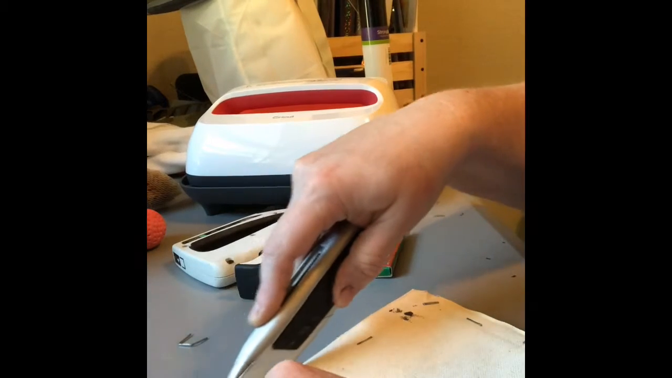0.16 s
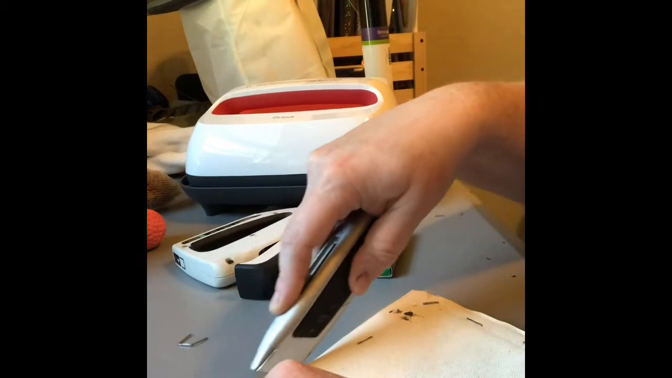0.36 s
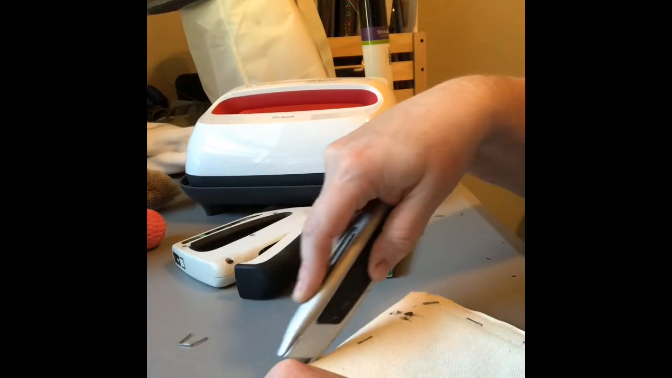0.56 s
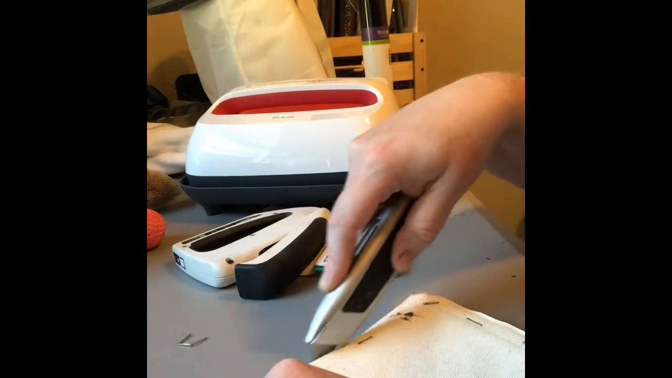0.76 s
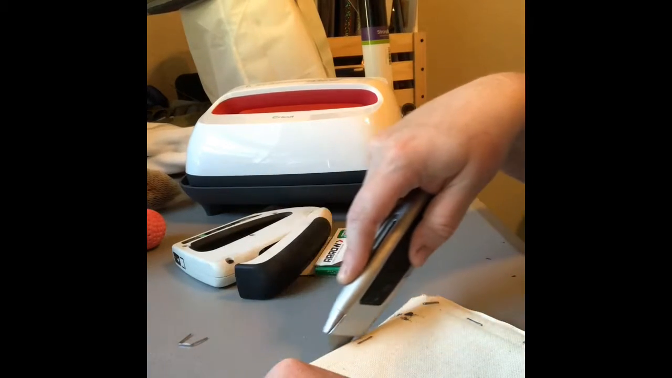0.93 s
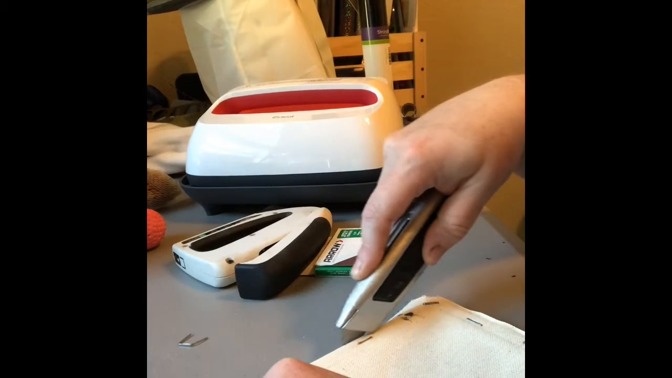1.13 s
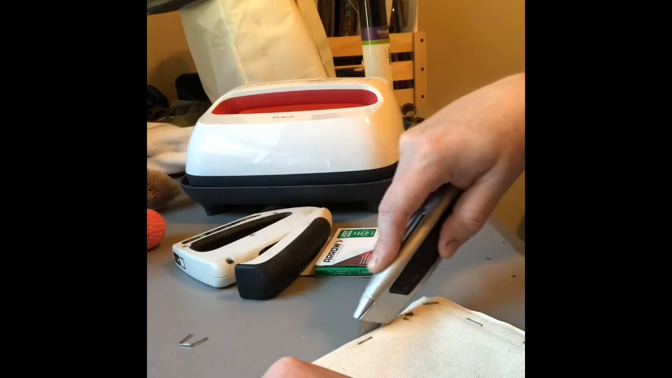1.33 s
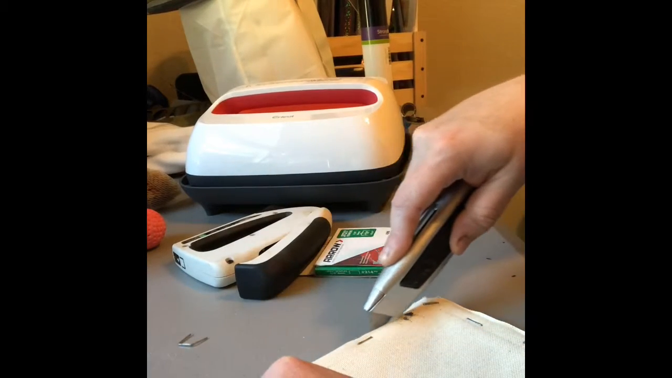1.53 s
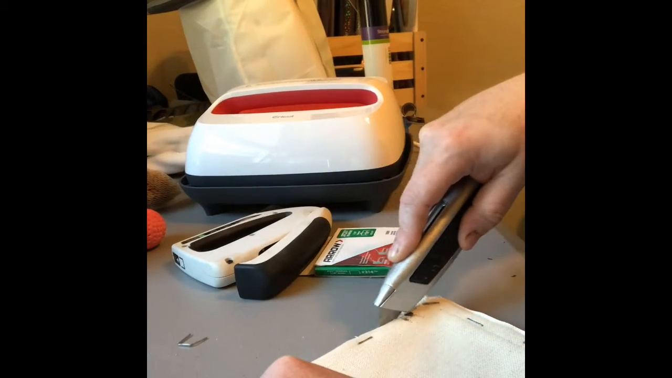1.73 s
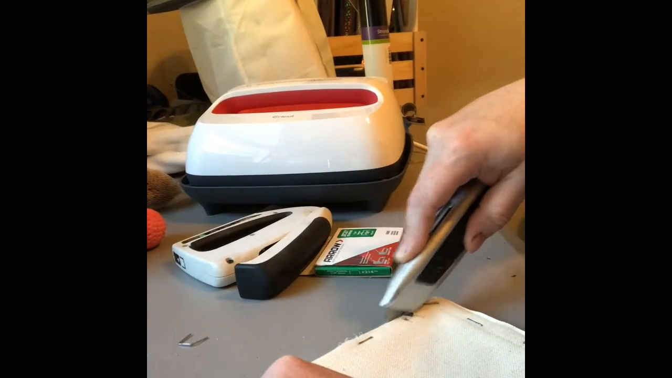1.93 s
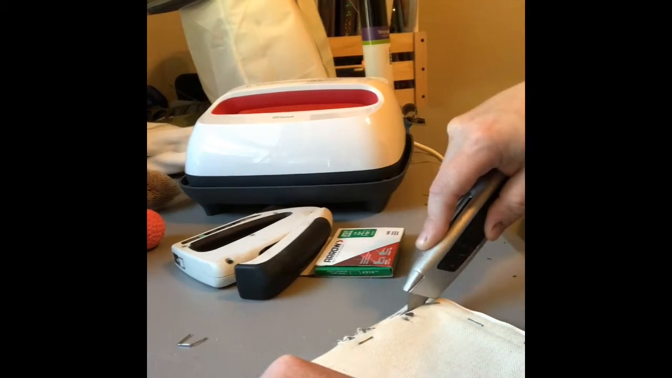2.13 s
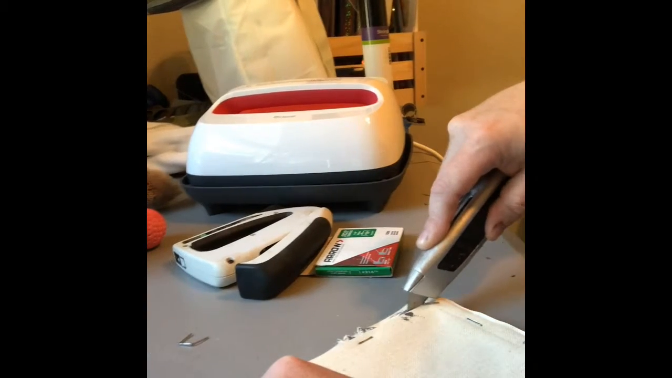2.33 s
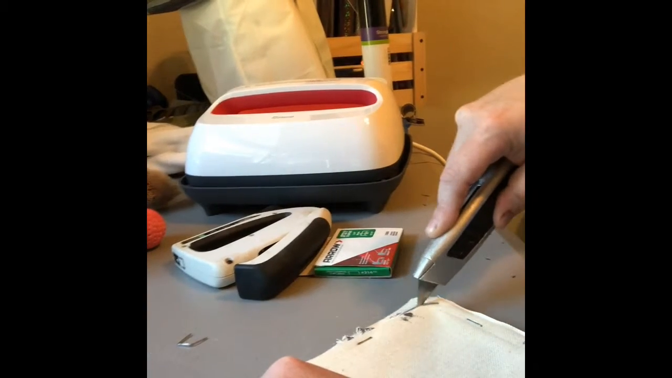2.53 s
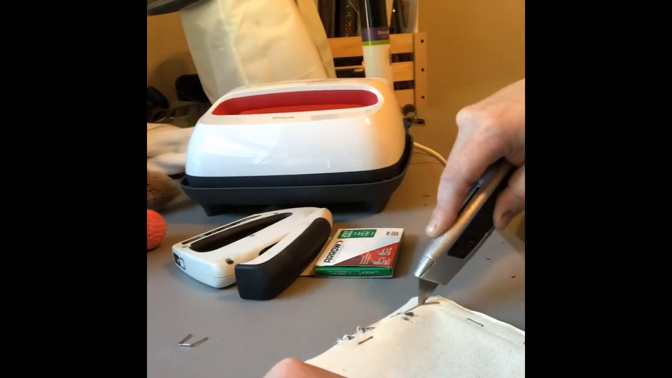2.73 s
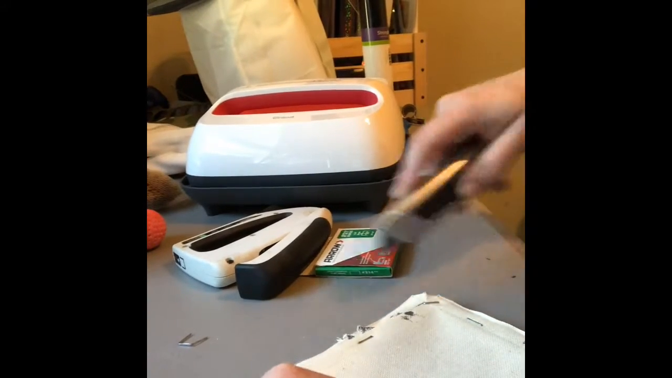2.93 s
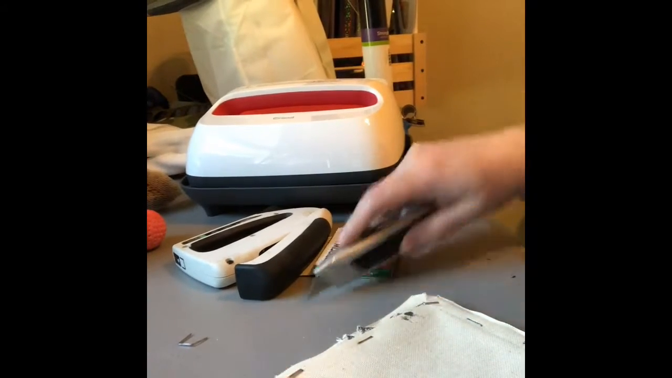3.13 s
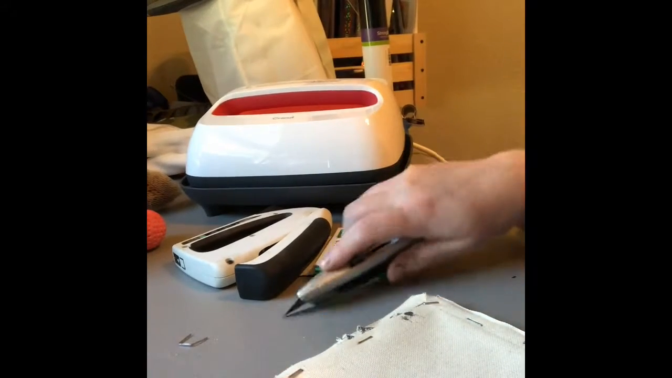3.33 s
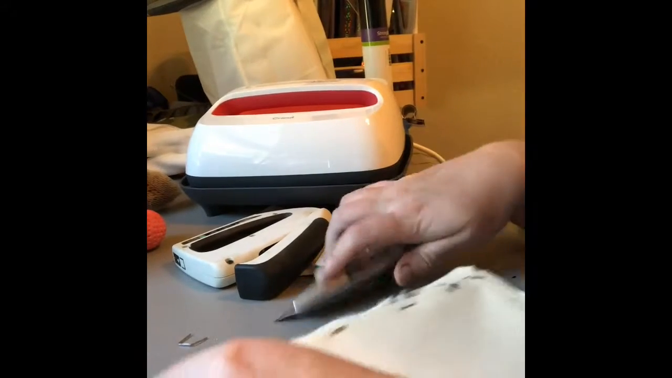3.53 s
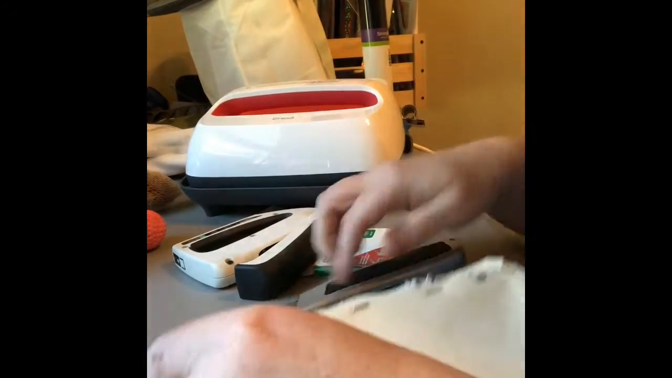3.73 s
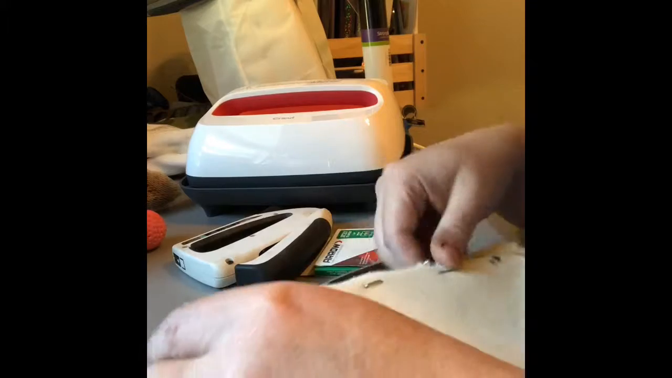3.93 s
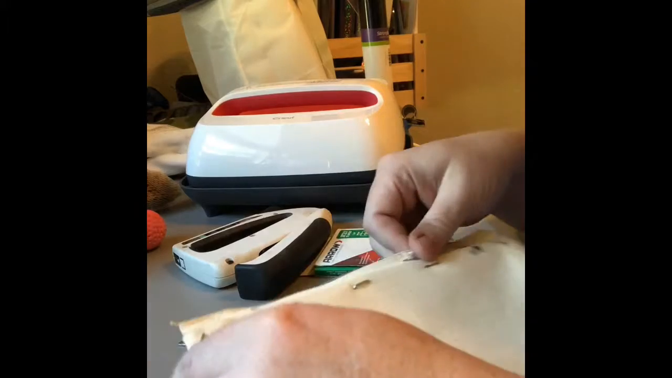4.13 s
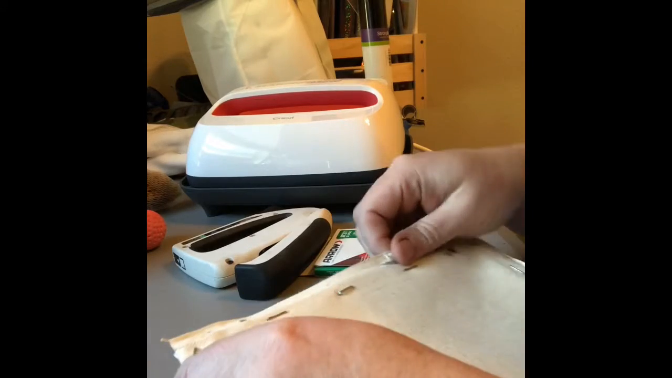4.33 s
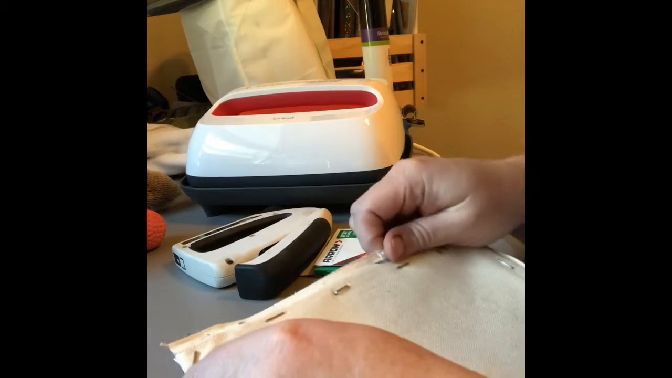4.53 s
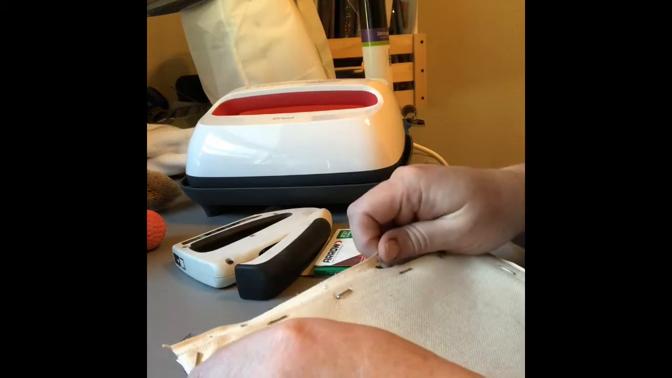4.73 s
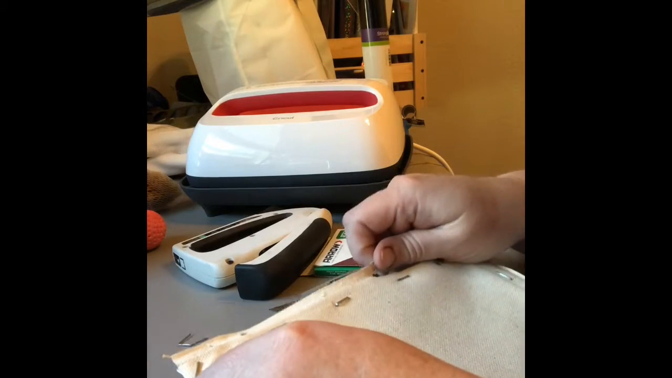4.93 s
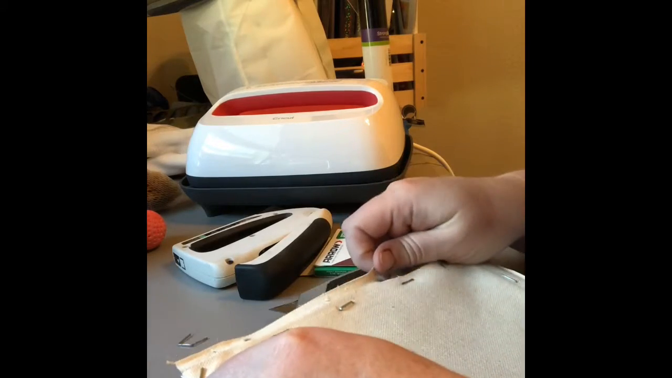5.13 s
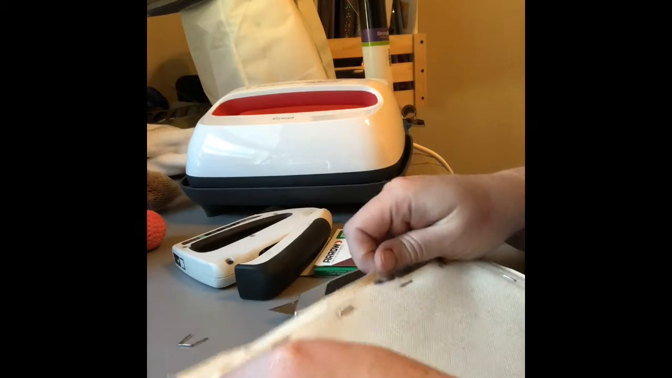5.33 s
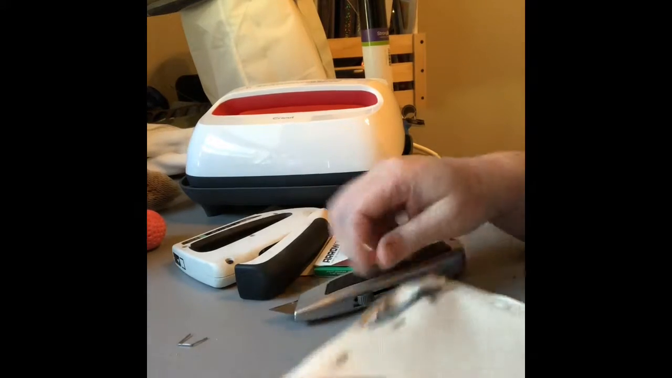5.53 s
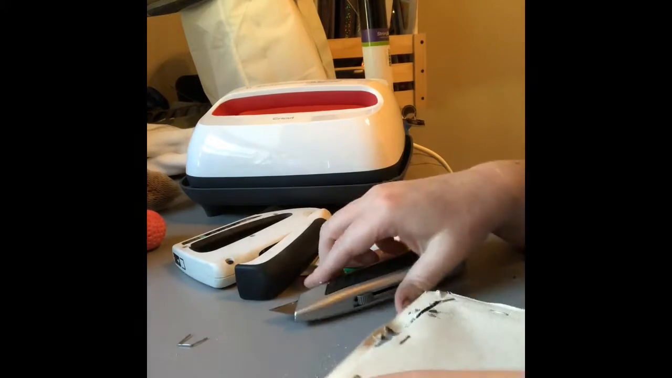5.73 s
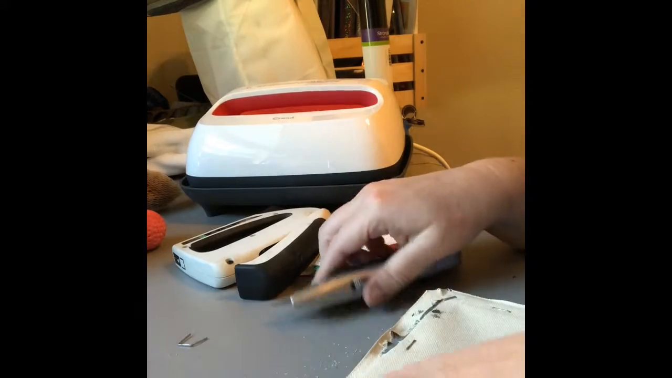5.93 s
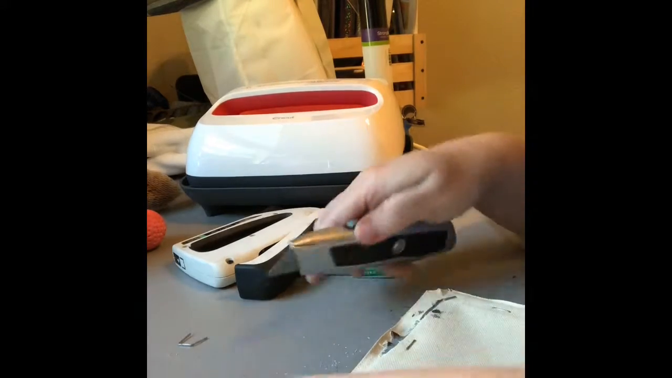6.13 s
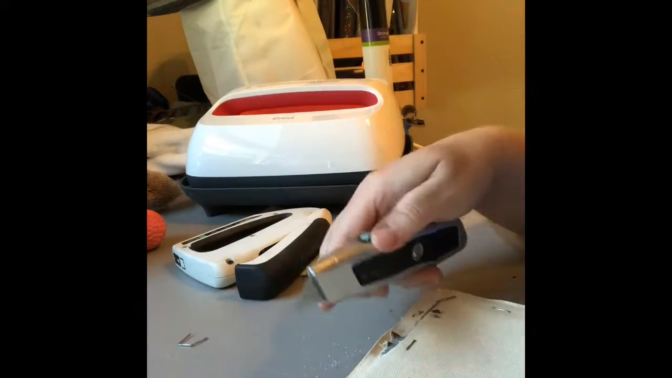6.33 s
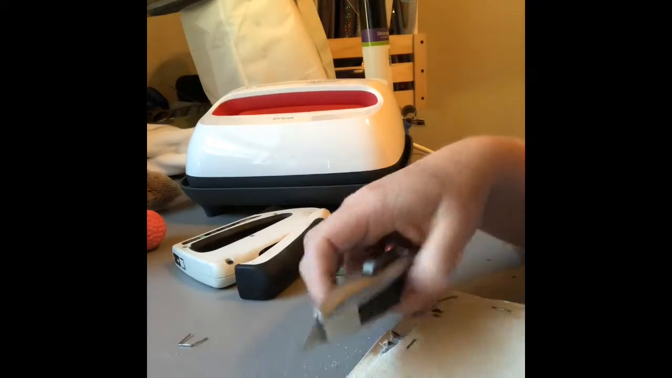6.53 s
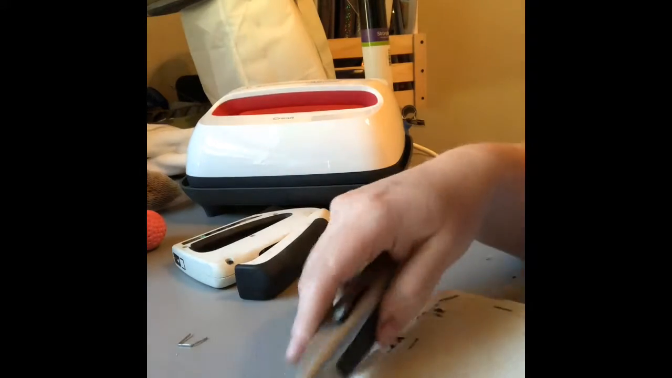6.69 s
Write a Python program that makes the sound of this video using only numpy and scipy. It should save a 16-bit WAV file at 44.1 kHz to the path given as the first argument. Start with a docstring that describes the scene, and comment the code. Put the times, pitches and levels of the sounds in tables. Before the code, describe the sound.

In a small quiet room, a hand works a metal knife under staples in canvas on a wooden frame. A loud clatter of knocks comes at once, then dry scraping, ticks and sharper prying bursts. Near the middle the knife is put down with hard knocks; faint skin rubbing and a thin squeak follow, then another knock and clatter as the knife is picked up. Close phone microphone, short dull room tail.

```python
"""A small quiet room with a table: a hand works a metal knife under staples in a canvas-covered wooden frame.
Soft filtered noise makes the room air, and a faint steady sine whines above it.
Canvas and skin rub in dense noise grains through resonances of weave, knife, wood and table.
The knife ticks in noise cracks and decaying modes; frame and knife knock on the ringing table top.
A staple squeaks in narrow noise, and a short diffuse tail follows all the sounds on the table."""
import sys
import numpy as np
from scipy import signal
from scipy.fft import rfft, irfft
from scipy.io import wavfile
from scipy.ndimage import uniform_filter1d

SR = 44100
rng = np.random.default_rng(int(sys.argv[2]) if len(sys.argv) > 2 else 0)


def unload_audio(sound):
    """Save the sound as a 16-bit wav file, at the path given as the first command line argument."""
    columns = np.transpose(np.atleast_2d(sound))
    # keep every value between -1 and 1, then stretch to whole-number steps
    steps = np.round(np.clip(columns, -1, 1) * 32767)
    wavfile.write(sys.argv[1], SR, steps.astype(np.int16))


N = 298116  # length in samples

# spectrum of the room air: (frequency [Hz], relative density [dB per Hz])
AIR_SPECTRUM = [(18, -50), (30, -5), (280, -5), (328, -6), (1160, -18.5), (1280, -19), (3060, -27),
                (6210, -28.5), (8520, -57), (14800, -34.5), (16000, -70)]
AIR_RMS_DB = -60.5  # before its gentle waver
# faint steady tone in the room: (frequency [Hz], rms level [dB])
WHINE_TONES = [(14998, -97)]
ROOM_DB, ROOM_T60_S, ROOM_HZ = -15, 0.2, 4000  # tail energy, decay, treble corner

# airy squeak as fingers draw a staple out, before its waver: (time [s], level [dB])
SQUEAK_LEVEL = [(4.8, -95), (4.9, -78), (5.17, -72), (5.45, -75), (5.52, -95)]
SQUEAK_HZ, SQUEAK_WIDTH_HZ = 4210, 180  # width of each of two passes

# modes of table top and frame: (frequency [Hz], relative level [dB])
TABLE_MODES = [(68, -5.5), (108, 2), (152, 1), (183, -1), (215, 1.5), (248, 0), (284, 1.5), (332, -2.5),
               (388, -4), (430, -8.5), (470, 6.5), (525, 2.5), (600, -1.5), (650, 11.5), (700, 17),
               (790, 15), (880, 29), (980, 40), (1120, -13), (1245, -8)]
# knocks on the table: (time [s], peak level [dB], struck region [Hz])
KNOCK_EVENTS = [(0.001, -30.5, 215), (0.11, -20, 250), (0.122, -10.5, 487), (0.133, -5, 295),
                (0.253, -22.5, 278), (0.483, -25.5, 300), (0.549, -21.5, 290), (1.164, -28, 403),
                (1.744, -21.5, 457), (1.78, -19.5, 333), (2.056, -29, 230), (2.151, -23, 510),
                (2.156, -18.5, 155), (2.544, -27, 150), (2.573, -25.5, 250), (2.587, -27, 175),
                (2.605, -25, 292), (2.885, -34.5, 223), (2.91, -28, 231), (2.931, -17.5, 433),
                (3.272, -32, 108), (3.433, -27, 410), (3.437, -22, 140), (3.498, -31.5, 287),
                (3.711, -9, 219), (3.744, -12, 170), (3.761, -12, 300), (3.784, -20, 300),
                (3.793, -19.5, 272), (3.814, -23, 117), (4.166, -42.5, 330), (4.246, -42, 333),
                (4.268, -34.5, 330), (4.365, -41.5, 340), (4.616, -55, 1100), (4.732, -32.5, 900),
                (4.734, -36.5, 327), (5.512, -40, 342), (5.676, -44, 200), (5.783, -41, 103),
                (5.949, -29, 330), (5.965, -6, 382), (6.077, -27, 420), (6.239, -38, 114),
                (6.29, -45.5, 754), (6.447, -38, 120), (6.634, -36.5, 280)]
# contact softness, decay at the struck pitch, distance at which modes are 6 dB weaker
KNOCK_CONTACT_MS, KNOCK_T60_S, KNOCK_OCTAVES = 0.44, 0.061, 0.52

# modes of knife body and blade: (frequency [Hz], relative level [dB])
KNIFE_MODES = [(1420, 19.5), (1640, 12), (1850, -34), (2300, 3.5), (2450, -23), (2660, -4.5), (2960, 4),
               (3250, 5), (3420, -3.5), (3900, -12), (4400, 2), (4800, 4), (5150, -5), (5480, 12),
               (6280, -4), (7100, -44), (7980, 1), (8640, -23)]
# knife and staple ticks; ring level is before its soft onset, top end is relative to it:
# (time [s], ring level [dB], struck region [Hz], top end [dB], ring T60 at the struck region [s])
TICK_EVENTS = [(0.117, -20, 2030, -20, 0.035), (0.1271, -13, 1770, -9, 0.025),
               (0.1315, -14, 3320, -19, 0.032), (0.142, -20, 5440, -21, 0.015),
               (0.483, -34.5, 2780, -8, 0.037), (0.5486, -27.5, 2850, -13, 0.026),
               (1.1671, -37, 2110, -6, 0.04), (1.3357, -34, 2370, -2, 0.032), (1.404, -39, 2300, -8, 0.032),
               (1.7421, -21.5, 2600, -20, 0.025), (1.7826, -31.5, 4890, -21, 0.029),
               (2.0524, -29.5, 2830, -4, 0.03), (2.1407, -28, 5780, 3, 0.03),
               (2.1514, -20.5, 2340, -9, 0.031), (2.2109, -36, 4770, -0.5, 0.022),
               (2.297, -43, 2410, -11, 0.03), (2.575, -30.5, 5170, -14, 0.025),
               (2.8468, -23.5, 3080, -1.5, 0.012), (2.8828, -17, 2450, -28, 0.0081),
               (2.9092, -20.5, 2600, -26, 0.013), (2.9294, -18.5, 2360, -32, 0.018),
               (2.933, -24, 2880, -25, 0.033), (3.082, -28, 4470, -29, 0.013),
               (3.0939, -36, 3300, -22, 0.011), (3.257, -42.5, 2180, -20, 0.085),
               (3.3384, -41, 5270, 6.5, 0.006), (3.413, -43, 3460, -3, 0.031),
               (3.4326, -27, 3050, -20, 0.014), (3.438, -36, 2380, -7, 0.031),
               (3.4934, -26.5, 3420, -24, 0.018), (3.7091, -14, 3300, -34, 0.026),
               (3.743, -16.5, 2980, -24, 0.03), (3.7525, -16.5, 5500, -24, 0.032),
               (3.779, -30, 5420, -14, 0.027), (3.793, -23.5, 5490, -18, 0.018),
               (3.936, -51.5, 2790, 2, 0.066), (3.9973, -49, 2930, -7, 0.045),
               (4.226, -43, 3310, -14, 0.05), (4.543, -43.5, 2210, 1, 0.025),
               (4.6168, -35, 2420, -15, 0.013), (4.7323, -31.5, 2770, 1.5, 0.02),
               (4.857, -48.5, 2410, -21, 0.024), (4.9152, -44, 2730, -17, 0.017),
               (5.0563, -41, 2180, -14, 0.018), (5.5036, -37, 2650, -10, 0.042),
               (5.513, -36.5, 2260, -3, 0.03), (5.5515, -42, 2970, -18, 0.033),
               (5.79, -50, 3250, -14, 0.03), (5.805, -38, 3380, -23, 0.036),
               (5.8565, -38.5, 3700, -20, 0.021), (5.903, -34, 2520, -11, 0.066),
               (5.9482, -22, 2280, -31, 0.024), (5.9643, -24.5, 3260, -28, 0.02),
               (6.0014, -26, 8800, 2, 0.022), (6.0054, -21, 3370, -16, 0.02),
               (6.0093, -21.5, 2530, -14, 0.029), (6.0173, -31, 3420, -14, 0.021),
               (6.0224, -33, 2460, -17, 0.026), (6.0748, -36, 3580, -32, 0.034),
               (6.291, -36.5, 3160, -18, 0.033)]
TICK_RISE_S = 0.0014  # metal slips off metal over a millisecond or so
# first contact of a tick, broad and very short; level relative to the tick
SNAP_DB, SNAP_T60_S, SNAP_HZ, SNAP_WIDTH_HZ = -4, 0.0024, 3030, 4500

# coarse weave of rubbed canvas: (frequency [Hz], width [Hz], relative level [dB])
COARSE_WEAVE = [(1120, 350, 3), (1370, 400, 0.5), (1725, 180, -1), (2040, 320, -3.5), (2336, 210, -4),
                (2767, 250, 0), (3560, 260, -6)]
# fine weave of rubbed canvas: (frequency [Hz], width [Hz], relative level [dB])
FINE_WEAVE = [(4280, 450, 4.5), (4810, 160, -6.5), (5250, 590, 5), (5780, 470, 0), (6380, 400, 0),
              (7210, 490, 0.5), (7830, 740, -2.5)]
# hiss of rubbed canvas: (frequency [Hz], width [Hz], relative level [dB])
CANVAS_HISS = [(8000, 540, 0), (9350, 730, 11), (10630, 710, 8), (11330, 500, -19), (12160, 780, 13),
               (13600, 680, -3), (14600, 2000, 7.5)]
# handle singing under a sliding hand: (frequency [Hz], width [Hz], relative level [dB])
HANDLE_HUM = [(3217, 260, 4), (3540, 195, -7)]
# body of the wooden frame: (frequency [Hz], width [Hz], relative level [dB])
WOOD_BODY = [(350, 91, -0.5), (474.5, 53, 1.5), (586, 116, 1), (798, 136, -5.5), (995, 110, -8)]

# In the gesture tables brightness is a control that each canvas layer scales;
# hum levels come before the hum layer's own trim.
# slow sliding of blade and hands; hum, wood and rumble are relative to the scrape:
# (time [s], scrape [dB], brightness [dB], knife hum [dB], wood body [dB], table rumble [dB])
SLIDE_MOTION = [(0, -72, -5, -14, -9, 0), (0.16, -53, -1, -6, 11, 7), (0.21, -44, 0.5, -9, -1.5, 7),
                (0.4, -48, -1, -4, -3.5, -0.5), (0.68, -48, -1.5, -13.5, -7, 3.5),
                (0.96, -47, 0, -12, 1.5, 4.5), (1.1, -52.5, -2.5, -3.5, -3, -4),
                (1.48, -55, -9, -10, -6, -6), (1.66, -47, -1.5, -6, -10.5, -1.5),
                (1.9, -62, -9, -10, 3, -5), (2.2, -65, -12, -6, 7, 3), (2.33, -73.5, -2, -15, 13, 22),
                (2.8, -71.5, -2, -12, -6, 9), (3.05, -68, -1, -2, -11, -1), (3.36, -54.5, -4, -5, -22, -15),
                (3.66, -57.5, -7.5, -11, 4.5, 6), (3.9, -64.5, -5, -4, -4, 9), (4.08, -64, -9, -8, -9, -2),
                (4.3, -74, -12, -3, 1, 9), (4.45, -57.5, 0.5, -7, -7.5, -2.5),
                (4.85, -69.5, -4.5, -14, 0.5, 5), (5.1, -62, -2.5, -20, -5, -7),
                (5.38, -68.5, -9, -18, -6, -6), (5.58, -55.5, -1, -4, -19, -9),
                (5.72, -53.5, -5, 0, -9.5, 0), (5.87, -53.5, -5, -2, -6, 3.5), (6.06, -58.5, 2, -9, 4, 6),
                (6.2, -67, 0.5, 2, -13, -7), (6.76, -62.5, -9.5, -14, -4, 5)]
# short strokes and shoves; wood and rumble are relative to the scrape:
# (time of full strength [s], rise [s], hold [s], fall [s], scrape [dB], brightness [dB],
#  wood body [dB], table rumble [dB])
STROKE_EVENTS = [(0.0, .01, 0.0022, 0.03, -42, -3, 0, -6), (0.114, 0.015, 0.025, .025, -30, -3, -2, -18),
                 (0.557, .08, 0.0086, 0.3, -45, -2.5, 0, -0.5), (1.163, 0.053, 0.005, 0.059, -47, 3, -7, 0),
                 (1.295, 0.1, 0.03, 0.2, -41.5, -1.5, -2, -2.5),
                 (1.746, 0.11, 0.015, .18, -45.5, -2.5, -5, 0.5),
                 (1.936, 0.032, 0.016, 0.27, -50.5, -4, -11, -13),
                 (2.056, 0.064, 0.036, 0.11, -40, -2, -4.5, 3),
                 (2.153, 0.034, 0.0047, 0.062, -37.5, -5, 6, 3), (2.303, 0.032, 0, 0.017, -60.5, 8, 1, 3),
                 (2.512, 0.014, 0.072, 0.049, -38, -4, -5.5, 2), (2.853, 0.016, 0, 0.021, -57, 7, -3, 11.5),
                 (2.891, 0.013, 0.044, 0.094, -45.5, -6, 6.5, 7.5), (3.093, .05, 0, .2, -69, -5, -11, -3),
                 (3.273, 0.2, 0, 0.14, -55.5, -1, -5.5, 5), (3.438, 0.01, 0, 0.1, -49.5, 11, 10.5, 11.5),
                 (3.516, 0.078, 0.0041, 0.1, -42.5, -7, -4, -2.5),
                 (3.712, 0.005, 0, 0.041, -41, -9, 23.5, 15.5), (3.752, 0.014, 0, 0.078, -28.5, -4.5, 1, 3),
                 (3.943, 0.039, 0.087, 0.13, -61, 1, -4, -2),
                 (4.236, 0.11, 0.0093, .085, -46, -10, -1.5, -6),
                 (4.372, 0.058, 0, 0.17, -50, -6.5, 3, -14),
                 (4.572, 0.11, 0.0099, 0.038, -52.5, -0.5, -17, -3),
                 (4.739, 0.038, 0, 0.081, -49.5, -4, -13, -6),
                 (4.949, 0.065, 0.0075, 0.4, -58.5, -3.5, -4, -3),
                 (5.072, 0.09, 0.0049, 0.08, -55.5, 3.5, -3, -5),
                 (5.458, 0.055, 0, .1, -52.5, 2.5, -20, -9),
                 (5.513, 0.034, 0.016, 0.074, -45.5, -8, -2.5, -10),
                 (5.909, 0.066, 0.0032, 0.068, -45, 0.5, -20, -13),
                 (5.967, 0.012, 0, 0.035, -38, -23, 14.5, -1), (6.087, 0.032, 0, 0.068, -58, -33, 12, 15),
                 (6.28, 0.12, 0.021, 0.21, -58.5, 3, -2, 3)]
STROKE_HUM_DB, RUMBLE_LINGERS = -19, 1.4  # hum over the scrape; factor on the fall time of the rumble
# chirps of the knife hum as skin catches and lets go: (time [s], hold [s], hum level [dB])
CHIRP_EVENTS = [(4.022, .014, -56), (4.042, 0.016, -46.5), (4.11, .016, -54), (4.15, 0.043, -51),
                (4.241, 0.04, -50.5), (4.34, .02, -59)]
CHIRP_RISE_S, CHIRP_FALL_S = 0.012, 0.017


def undb(db):
    """Gain of a level in dB."""
    return 10 ** (np.asarray(db) / 20)


def level(x, db):
    """Scale to an rms level in dB."""
    return x * undb(db) / np.sqrt(np.mean(x ** 2))


def t60_fade(t, t60):
    """Exponential decay that falls 60 dB in t60 seconds."""
    return 1000.0 ** (-t / t60)


def bands(x, peaks):
    """Parallel resonances (Hz, width in Hz, dB) with alternating polarity."""
    total = 0
    for k, (hz, width, db) in enumerate(peaks):
        b, a = signal.iirpeak(hz, hz / width, SR)
        total = total + (-1) ** k * undb(db) * signal.lfilter(b, a, x)
    return total


def walk(rate):
    """Smooth random wander: bounded random levels, rate of them per second, averaged twice."""
    hold = int(SR / rate)
    steps = np.clip(rng.standard_normal(N // hold + 1), -1.6, 1.6)
    smooth = uniform_filter1d(np.repeat(steps, hold), hold)
    return 1.4 * uniform_filter1d(smooth, hold)[:N]


def add(out, s, x):
    """Mix a short sound in at a time in seconds."""
    i = int(s * SR)
    out[i:i + len(x)] += x[:N - i]


def ring(modes, centre_hz, octaves, t60):
    """One blow: modes near the struck region are favoured, higher ones die sooner; peak 1."""
    hz, db = np.transpose(modes)[:, :, None]
    size, tune = rng.standard_normal((2, len(modes), 1))
    t = np.arange(int(0.3 * SR)) / SR
    distance = np.log2(hz / centre_hz) / octaves
    gain = np.sign(tune) * undb(db + 3 * size - 6 * distance ** 2)
    fade = t60_fade(t * np.sqrt(hz / centre_hz), t60)
    # each blow detunes its modes slightly
    tones = np.sin(2 * np.pi * hz * (1 + 0.015 * tune) * t)
    x = np.sum(gain * fade * tones, axis=0)
    return x / np.max(np.abs(x))


def floor():
    """Quiet room air: noise shaped by a smooth spectrum, gently wavering."""
    hz, db = np.transpose(AIR_SPECTRUM)
    f = np.arange(N // 2 + 1) * SR / N + 1  # 1 Hz offset avoids log of zero
    colour = undb(np.interp(np.log(f), np.log(hz), db))
    air = irfft(rfft(rng.standard_normal(N)) * colour, N)
    return level(air, AIR_RMS_DB) * undb(0.6 * walk(3.13))


def whine():
    """A thin steady electrical tone, made from a sine."""
    t = np.arange(N) / SR
    return sum(np.sqrt(2) * undb(db) * np.sin(2 * np.pi * hz * t) for hz, db in WHINE_TONES)


def room(x):
    """Diffuse tail of decaying noise that swells in over 8 ms, dull at the top."""
    t = np.arange(int(0.5 * SR)) / SR
    tail = rng.standard_normal(len(t)) * np.minimum(t / 0.008, 1) * t60_fade(t, ROOM_T60_S)
    tail = signal.lfilter(*signal.butter(1, ROOM_HZ, fs=SR), tail)
    tail *= undb(ROOM_DB) / np.sqrt(np.sum(tail ** 2))
    return signal.fftconvolve(x, tail)[:N]


def squeak():
    """Staple squeak: noise through one narrow resonance, applied twice, with a wavering level."""
    peak = [(SQUEAK_HZ, SQUEAK_WIDTH_HZ, 0)]
    airy = bands(bands(rng.standard_normal(N), peak), peak)
    s, db = np.transpose(SQUEAK_LEVEL)
    envelope_db = np.interp(np.arange(N) / SR, s, db)
    return level(airy, 0) * undb(envelope_db + 1.5 * walk(18))


def knocks():
    """Blows into the table's modes, softened by the length of the contact."""
    out = np.zeros(N)
    width = KNOCK_CONTACT_MS * SR / 1000
    push = np.exp(-((np.arange(300) - 2.5 * width) / width) ** 2)
    for s, db, hz in KNOCK_EVENTS:
        blow = np.convolve(ring(TABLE_MODES, hz, KNOCK_OCTAVES, KNOCK_T60_S), push)
        add(out, s, undb(db) * blow / np.max(np.abs(blow)))
    return out


def ticks():
    """Metal contact: the ring of the knife, a short crack of noise, its sharp top end and a snap."""
    out, t = np.zeros(N), np.arange(1500) / SR
    top = signal.butter(2, 7500, "high", fs=SR, output="sos")
    for s, db, hz, top_db, t60 in TICK_EVENTS:
        tone = ring(KNIFE_MODES, hz, 0.45, t60)
        onset = np.minimum(np.arange(len(tone)) / SR / TICK_RISE_S, 1)
        add(out, s, undb(db) * tone * onset)
        crack_noise, edge_noise = rng.standard_normal((2, len(t)))
        fade = np.minimum(t / TICK_RISE_S, 1) * t60_fade(t, 0.7 * t60)
        crack = bands(crack_noise * fade, [(hz, 0.5 * hz, 0)])
        add(out, s, undb(db - 3.0) * crack / np.max(np.abs(crack)))
        edge = signal.sosfilt(top, edge_noise * fade)
        add(out, s, undb(db + top_db) * edge / np.max(np.abs(edge)))
        # the snap shares its noise with the top end
        snap = bands(edge_noise * t60_fade(t, SNAP_T60_S), [(SNAP_HZ, SNAP_WIDTH_HZ, 0)])
        add(out, s, undb(db + SNAP_DB) * snap)
    return out


def grains(per_s, spread_db, bed):
    """Strength of fibre slips: random spikes of unequal size over a smooth bed; rms 1."""
    size = undb(spread_db * np.minimum(rng.exponential(size=N), 4))
    spikes = (rng.random(N) < per_s / SR) * size
    return level(level(spikes, 0) + bed, 0)


def weave(slips, peaks, drift_db):
    """Patches of cloth slip together, each resonance swelling and fading alone; rms 1."""
    total = np.zeros(N)
    for peak in peaks:
        swell = undb(drift_db * walk(5.134))
        total += swell * bands(slips * rng.standard_normal(N), [peak])
    return level(total, 0)


def stroke(t, s, rise_s, hold_s, fall_s):
    """Power of one stroke: up 20 dB in the rise, steady, down 20 dB in the fall."""
    early = np.maximum(s - t, 0)
    late = np.maximum(t - s - hold_s, 0)
    return 100.0 ** -(early / rise_s + late / fall_s)


def contact():
    """Add slide and strokes in power: brightness in dB, then gains of scrape, hum, wood and rumble."""
    t = np.arange(0, N + 44, 44) / SR  # about one point per millisecond
    s, *columns = np.transpose(SLIDE_MOTION)
    scrape_db, bright_db, *over_db = (np.interp(t, s, c) for c in columns)
    power = undb(scrape_db + np.array([0 * t, *over_db])) ** 2
    # brightness is averaged by scrape power, so the stronger gesture dominates
    bright = power[0] * bright_db
    for s, rise, hold, fall, db, bright_db, wood_db, rumble_db in STROKE_EVENTS:
        shape = stroke(t, s, rise, hold, fall)
        rumble_shape = stroke(t, s, rise, hold, fall * RUMBLE_LINGERS)
        shapes = np.array([shape, shape, shape, rumble_shape])
        layer_db = db + np.array([[0], [STROKE_HUM_DB], [wood_db], [rumble_db]])
        power += undb(layer_db) ** 2 * shapes
        bright += undb(db) ** 2 * shape * bright_db
    for s, hold, db in CHIRP_EVENTS:
        power[1] += undb(db) ** 2 * stroke(t, s, CHIRP_RISE_S, hold, CHIRP_FALL_S)
    curves = (bright / power[0], *np.sqrt(power))
    return [np.interp(np.arange(N) / SR, t, c) for c in curves]


def rubbing():
    """Canvas and skin slip in grains that excite weave, hiss, knife hum, wood body and table rumble."""
    bright_db, scrape_gain, hum_gain, wood_gain, rumble_gain = contact()
    slips = grains(per_s=2500, spread_db=2.5, bed=1.0) * undb(2.5 * walk(30))
    # brightness lifts fine weave and hiss and lowers the coarse weave
    coarse = weave(slips, COARSE_WEAVE, drift_db=2.0) * undb(-4.5 - 0.37 * bright_db)
    fine = weave(slips, FINE_WEAVE, drift_db=3.5) * undb(-4 + 1.15 * bright_db)
    hiss = weave(slips, CANVAS_HISS, drift_db=-3.0) * undb(-12.5 + 1.23 * bright_db)
    scrape = scrape_gain * (coarse + fine + hiss)
    hum = hum_gain * weave(slips, HANDLE_HUM, drift_db=1.5) * undb(-3 + 4 * walk(25))
    wood = wood_gain * weave(slips, WOOD_BODY, drift_db=2) * undb(2 * walk(20))
    jolts = grains(per_s=630, spread_db=2.0, bed=0.64) * rng.standard_normal(N) * rumble_gain
    # the table keeps ringing after each jolt, in its ten lowest modes
    table = [(hz, 1.4 * np.sqrt(hz), db) for hz, db in TABLE_MODES[:10]]
    # rms response to plain noise, so that the rumble gain sets the level
    unit = np.sqrt(np.mean(bands(rng.standard_normal(SR), table) ** 2))
    rumble = bands(jolts, table) / unit
    return scrape + hum + wood + rumble


def scene():
    """Everything on the table with its room tail, over the air and the whine."""
    near = rubbing() + ticks() + knocks() + squeak()
    return (near + room(near) + floor() + whine())[None]


def record(dry):
    """A nearby phone trims the deepest bass and cuts the top steeply."""
    low_cut = signal.butter(4, 48, "high", fs=SR, output="sos")
    top_cut = signal.ellip(10, 0.2, 60, 15850, fs=SR, output="sos")
    return signal.sosfilt(top_cut, signal.sosfilt(low_cut, dry))


dry = scene()
out = record(dry)
unload_audio(out)
```